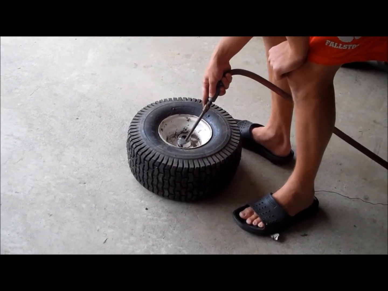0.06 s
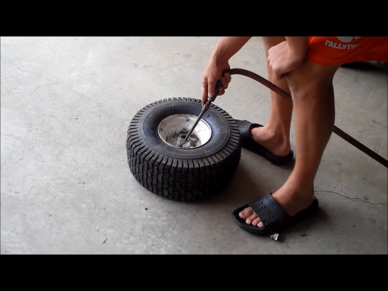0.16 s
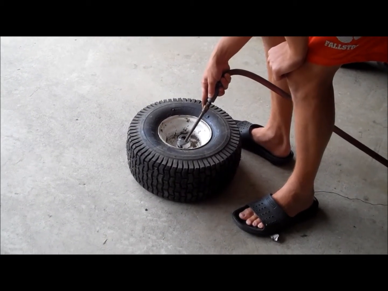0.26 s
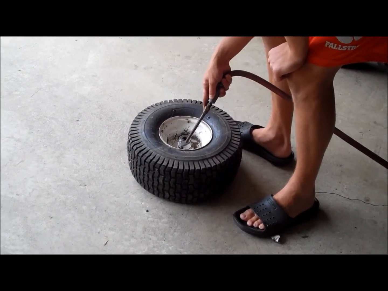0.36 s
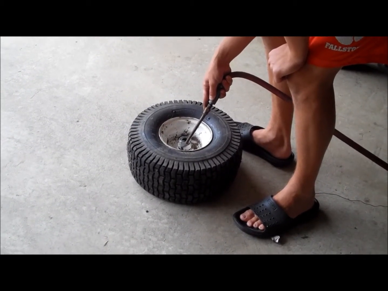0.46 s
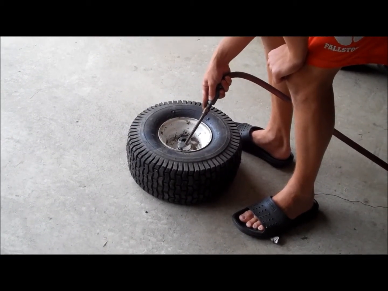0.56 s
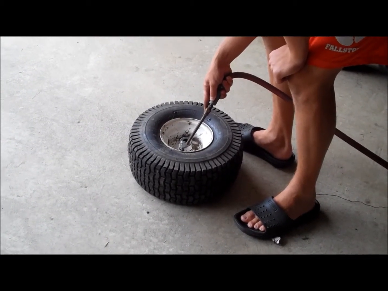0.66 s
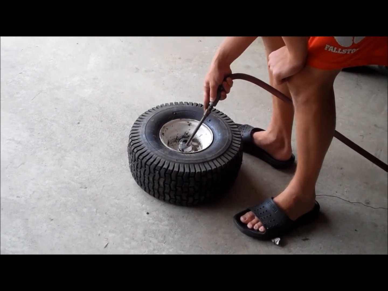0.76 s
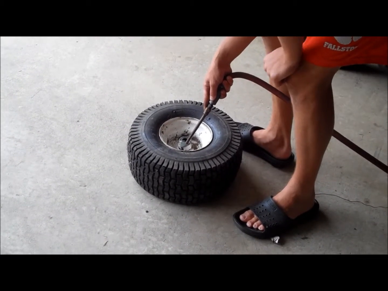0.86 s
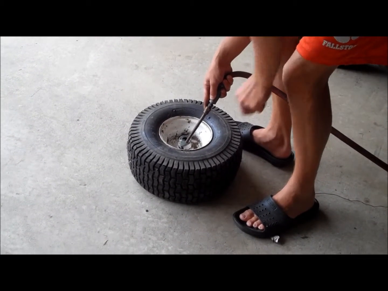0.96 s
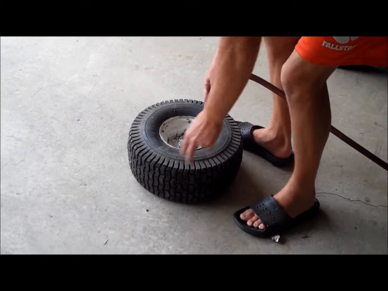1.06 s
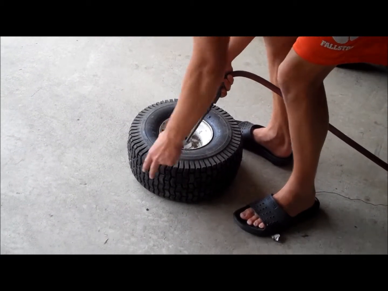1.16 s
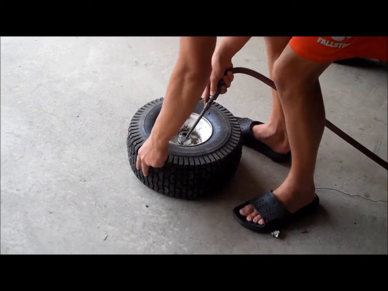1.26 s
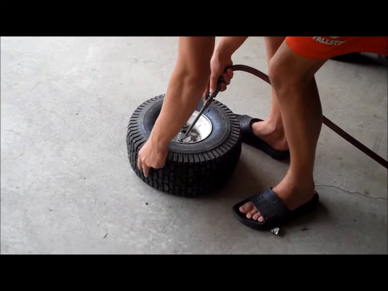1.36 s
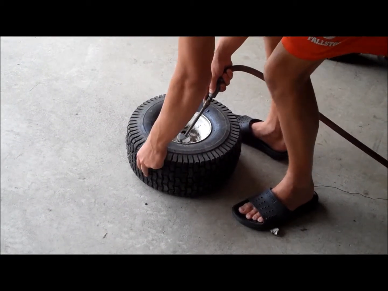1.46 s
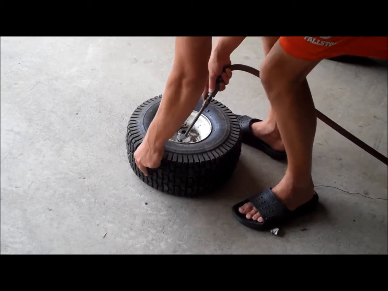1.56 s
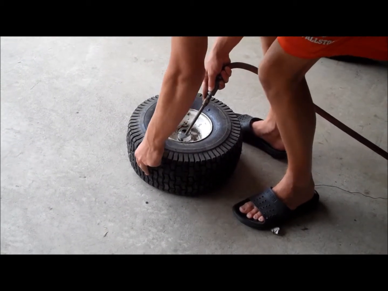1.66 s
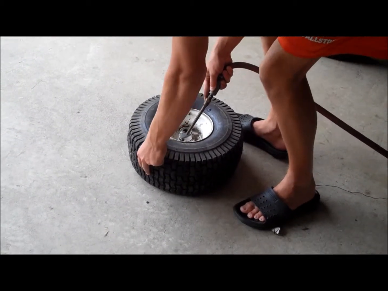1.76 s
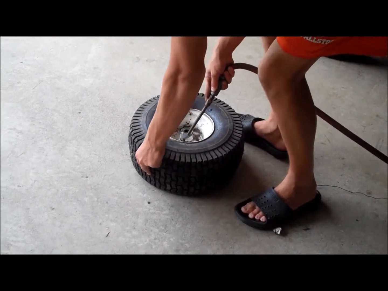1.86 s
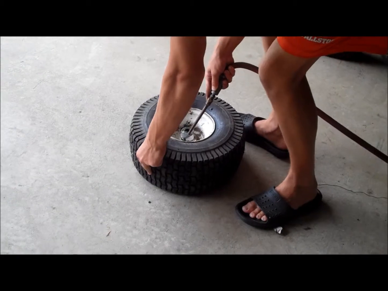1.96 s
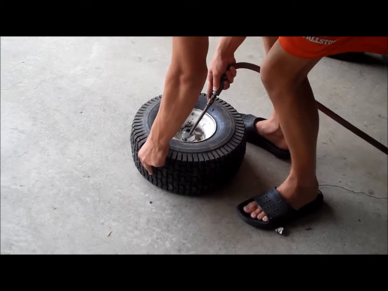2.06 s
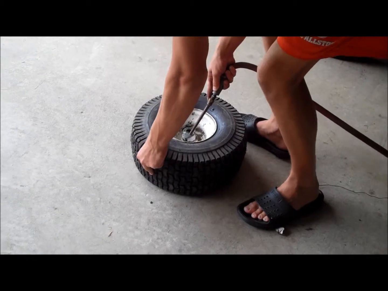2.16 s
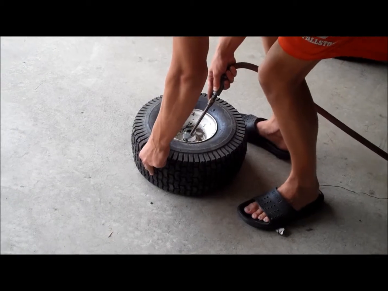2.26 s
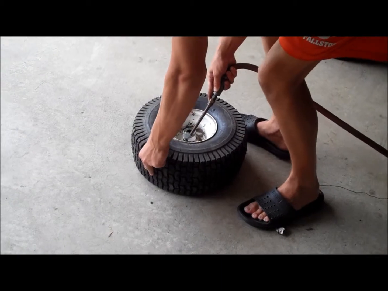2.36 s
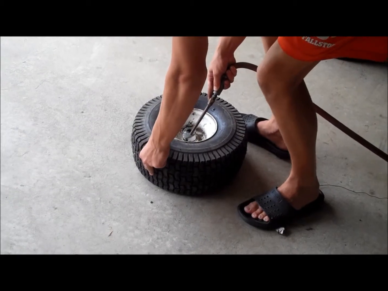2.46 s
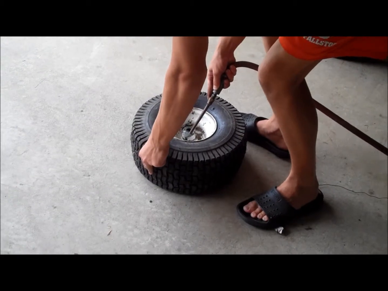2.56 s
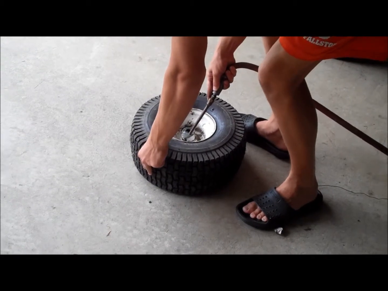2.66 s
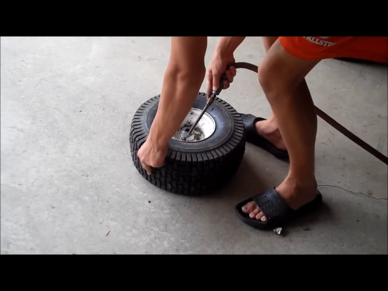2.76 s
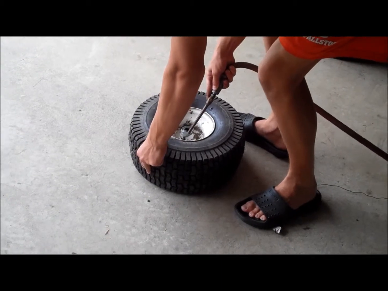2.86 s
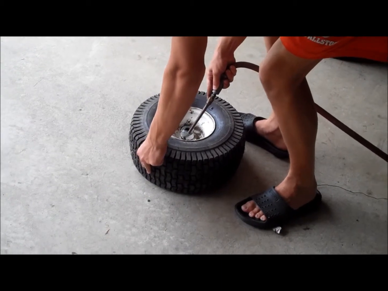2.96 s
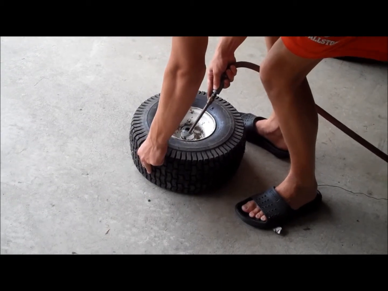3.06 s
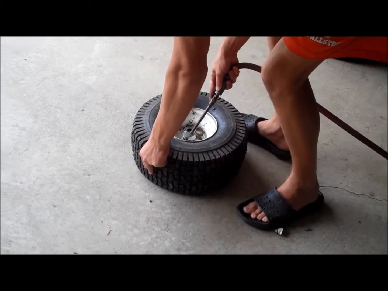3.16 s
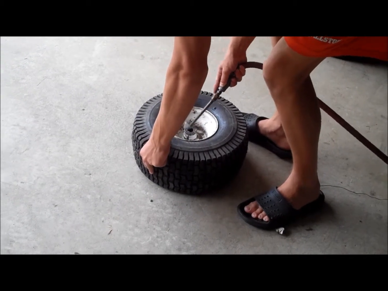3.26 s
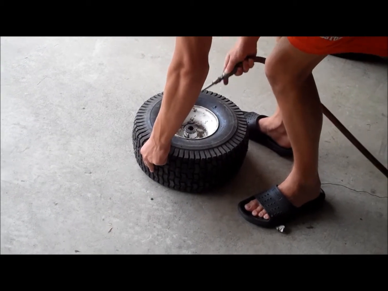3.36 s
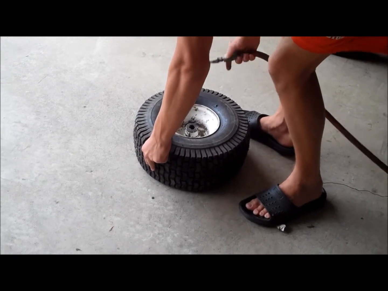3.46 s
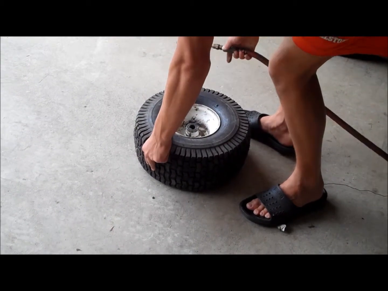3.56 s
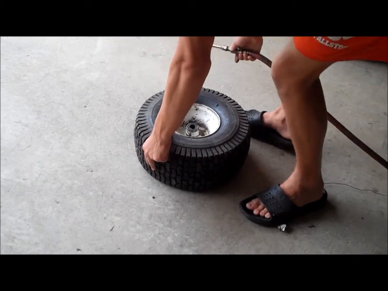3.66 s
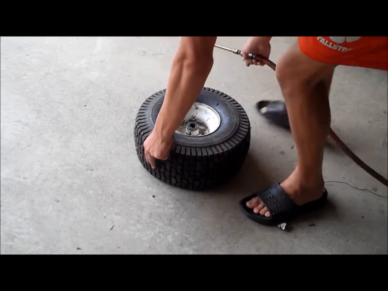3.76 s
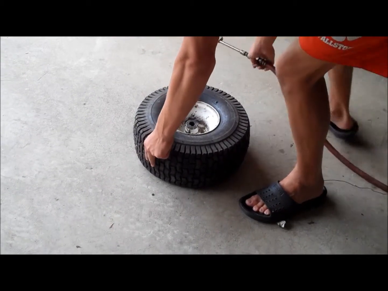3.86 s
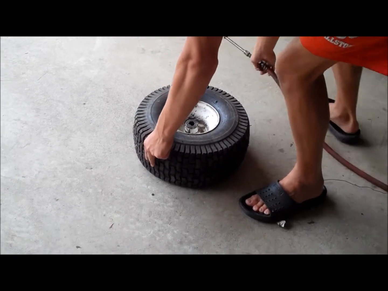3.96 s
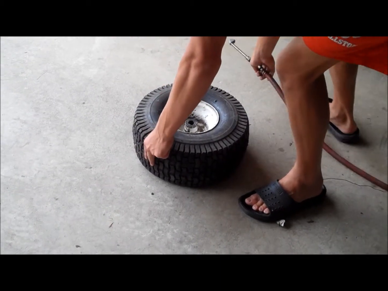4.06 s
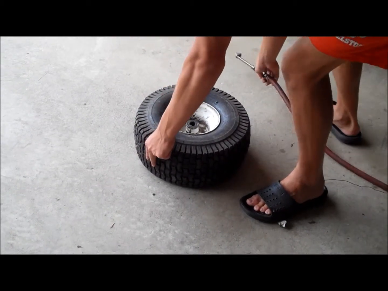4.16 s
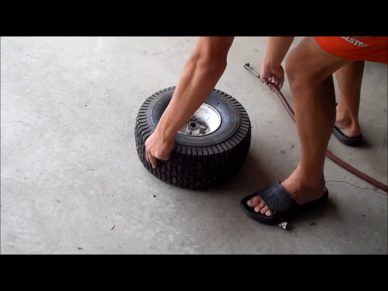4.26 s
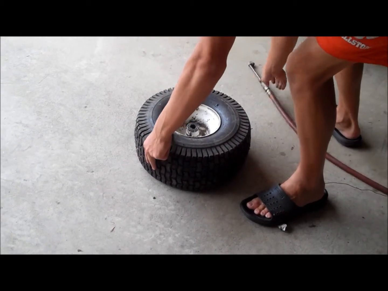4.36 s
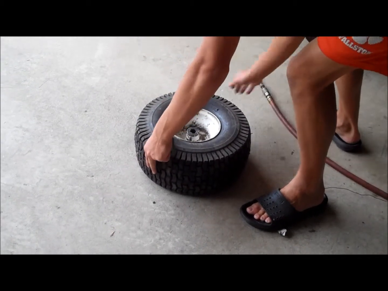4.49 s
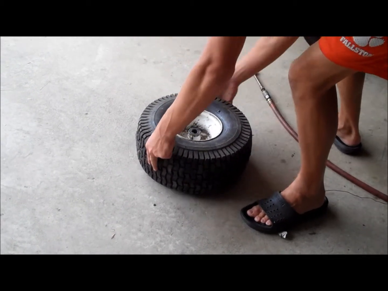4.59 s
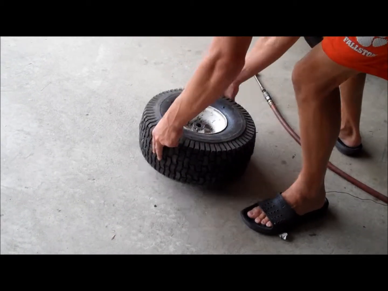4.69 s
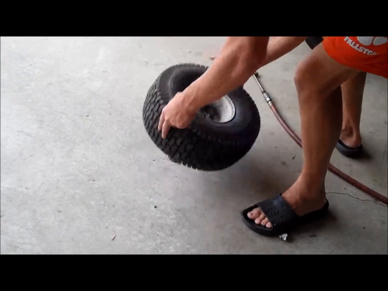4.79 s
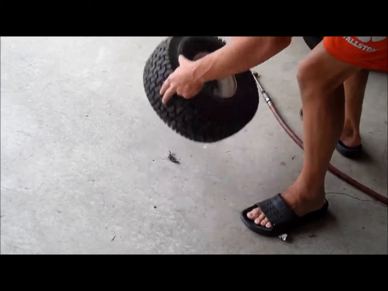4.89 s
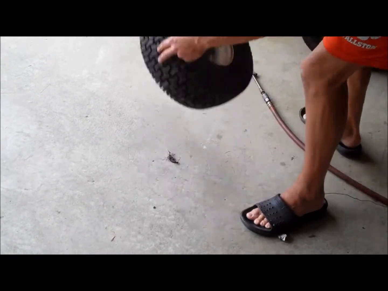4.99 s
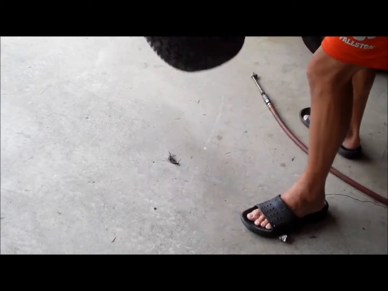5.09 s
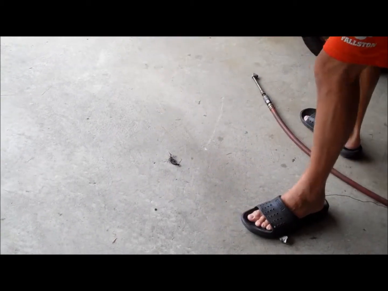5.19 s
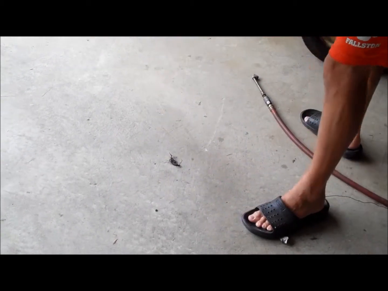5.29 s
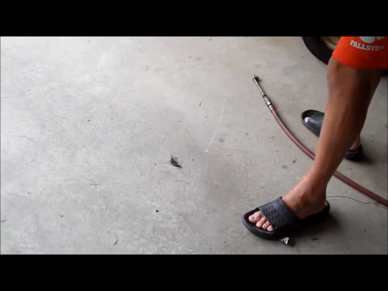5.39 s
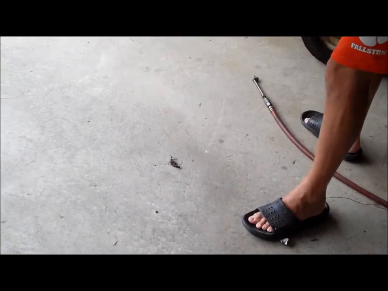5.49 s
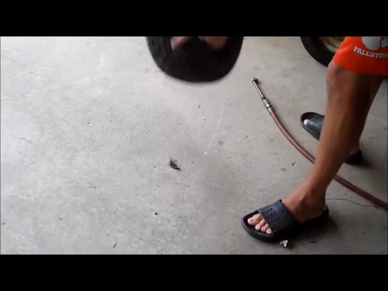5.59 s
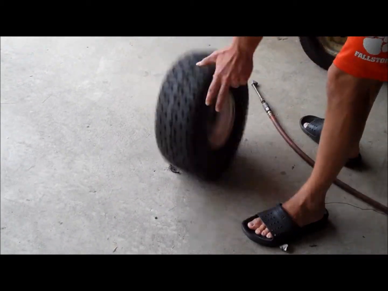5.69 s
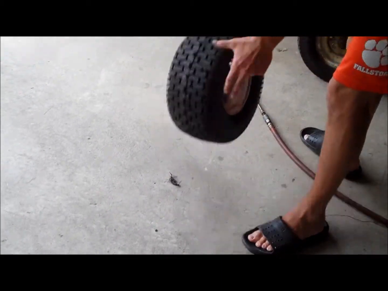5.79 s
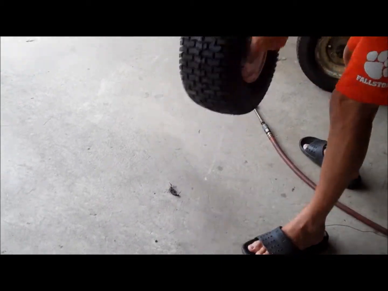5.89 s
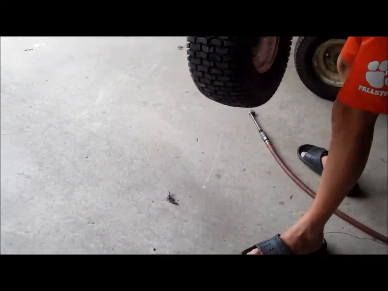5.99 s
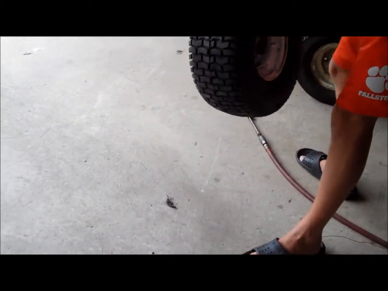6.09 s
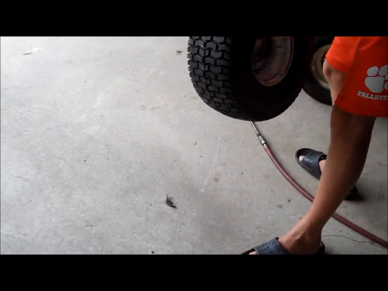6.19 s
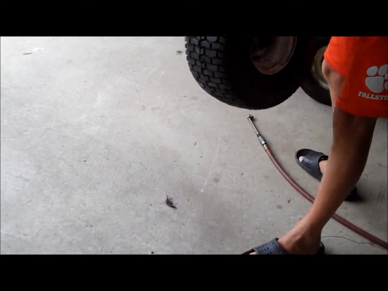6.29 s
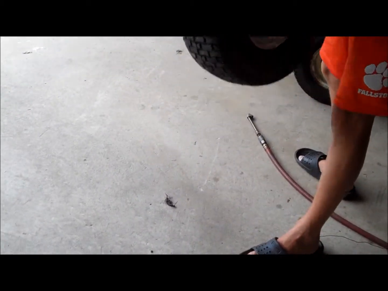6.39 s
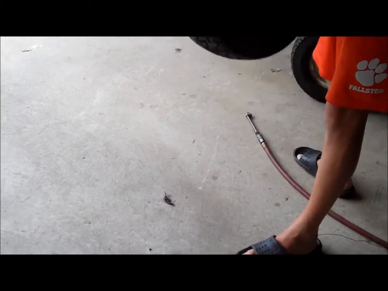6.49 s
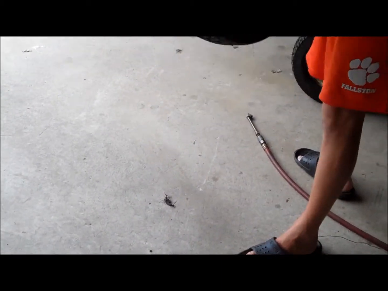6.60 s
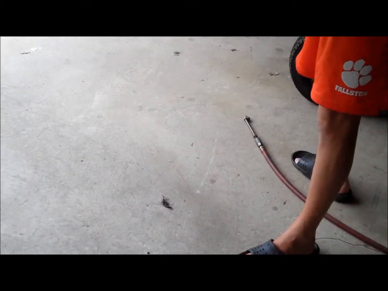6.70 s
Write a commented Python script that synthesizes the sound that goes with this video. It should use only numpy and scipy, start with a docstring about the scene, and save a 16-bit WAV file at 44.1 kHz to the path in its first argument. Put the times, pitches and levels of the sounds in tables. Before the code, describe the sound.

Compressed air hisses steadily from a leaky chuck on a small tire, close to the microphone in a garage. About halfway through, the chuck comes off the valve with a spit and a sharp pop but keeps hissing. A sandal scuffs, the chuck clinks onto concrete and a hand softly slaps the tire. Near the end the tire bounces once with a loud smack. A machine hums faintly behind.

```python
"""Leaky air chuck in a garage

Close to a stereo microphone, compressed air hisses from a leaky chuck on a small tire. The chuck pops
off the valve, keeps leaking and is laid on the concrete; the tire is slapped, then bounced once.
Behind it a machine hums and a far engine slows. The bounce clips the preamp and the gain ducks."""
import sys
import numpy as np
from scipy import signal
from scipy.fft import rfft, irfft, next_fast_len
from scipy.io import wavfile
from scipy.ndimage import uniform_filter1d, map_coordinates

SR = 44100
rng = np.random.default_rng(int(sys.argv[2]) if len(sys.argv) > 2 else 0)


def transcribe(u):
    """Save the signal u as a 16-bit wav file named by the first command-line argument.

    u: samples, shape (n,) or (channels, n), limited to [-1, 1]; the rate is SR.
    q: integer samples, one column per channel.
    """
    v = np.clip(np.atleast_2d(u).T, -1, 1)
    q = np.round(v * 32767).astype(np.int16)
    wavfile.write(sys.argv[1], SR, q)


N = 297234


def amp(db):
    """Gain of a level in dB."""
    return 10 ** (np.asarray(db) / 20)


def unit(x):
    """Scaled to rms 1."""
    return x / np.sqrt(np.mean(x ** 2) + 1e-20)


def along(points, hz):
    """(Hz, value) points read at hz on a log axis."""
    f, v = np.transpose(points)
    return np.interp(np.log(hz + 1), np.log(f + 1), v)


def curves(rows, t=None):
    """The columns after the time, read at times t (every sample if not given)."""
    times, *columns = np.transpose(rows)
    return [np.interp(np.arange(N) / SR if t is None else t, times, c) for c in columns]


def wobble(rate):
    """A smooth random curve, rate knots a second."""
    return map_coordinates(rng.standard_normal(int(N * rate / SR) + 4), [np.arange(N) * rate / SR])


def filtered(x, response):
    """x through a complex frequency response."""
    size = next_fast_len(N + SR // 2)
    return irfft(rfft(x, size) * response(np.fft.rfftfreq(size, 1 / SR)), size)[..., :N]


def resonant(x, peaks):
    """x through causal (Hz, width, dB) resonances of alternating sign."""
    def response(f):
        return sum((-1) ** k * amp(db) * 1j * f * width / (hz * hz - f * f + 1j * f * width)
                   for k, (hz, width, db) in enumerate(peaks))
    return filtered(x, response)


def ring(modes, scatter_db, attack_s):
    """One blow on (Hz, dB, t60) modes, each at a new strength."""
    t = np.arange(SR // 2) / SR
    tones = sum(amp(db + rng.normal(0, scatter_db) - 60 * t / t60) * np.sin(2 * np.pi * hz * t)
                for hz, db, t60 in modes)
    return tones * (1 - np.exp(-t / attack_s))


def scrape(events, peaks, blow=0, grit=1):
    """Short runs of rough contact, each led by an optional sharp blow, excite resonances."""
    force = np.zeros(N)
    t = np.arange(SR // 10) / SR
    for start, db, length in events:
        contact = grit * np.exp(-(t / length) ** 4) * rng.standard_normal(len(t))
        contact[0] += blow
        force[round(start * SR):][:len(t)] += amp(db) * contact
    return resonant(force, peaks)


# likeness of the microphone's two channels: (frequency [Hz], correlation [0-1])
MIC_LIKENESS = [(60, 0.77), (150, 0.97), (380, 0.91), (950, 0.87), (2370, 0.81), (5950, 0.48),
                (14900, 0.49)]
# their balance: (frequency [Hz], left minus right [dB])
MIC_BALANCE = [(60, 0), (240, 1), (950, 0.5), (3760, 1.5), (14900, -1.5)]

def stereo_noise(shape, size=1024, likeness=MIC_LIKENESS):
    """Noise at two closely spaced capsules, its short-time spectrum scaled by shape(Hz, s)."""
    hz, t, noise = signal.stft(rng.standard_normal((2, N + SR)), SR, nperseg=size)
    spread = np.arccos(np.clip(along(likeness, hz), -1, 1))[:, None] / 2
    mid, side = noise[0] * np.cos(spread), noise[1] * np.sin(spread)
    lean = amp(along(MIC_BALANCE, hz) / 2)[:, None]
    pair = np.array([(mid + side) * lean, (mid - side) / lean])
    return signal.istft(pair * shape(hz[:, None], t), SR, nperseg=size)[1][:, :N]


# low rumble all around the microphone: (frequency [Hz], relative level [dB])
RUMBLE_SPECTRUM = [(11, -32), (18, -0.5), (124, -4.5), (146, -6), (337, -8), (404, -7), (438, -11),
                   (460, -6.5), (618, -13), (900, -8.5), (1170, -10), (1980, -120)]

def rumble():
    """The garage's rumble thins as the engine leaves."""
    start_db, fade_db_per_s = -52.5, 0.29
    noise = filtered(stereo_noise(lambda hz, t: 1), lambda hz: amp(along(RUMBLE_SPECTRUM, hz)))
    return amp(start_db - fade_db_per_s * np.arange(N) / SR + 1.2 * wobble(2.56)) * unit(noise)


# the far engine's upper tone: (time [s], frequency [Hz])
ENGINE_PITCH = [(0, 102.8), (1.1, 98.7), (2.8, 96.3), (3.1, 92), (5.2, 84)]
# its two tones at the microphone: (time [s], upper level [dB], lower level [dB])
ENGINE_LEVELS = [(0, -48, -56), (0.15, -42, -55), (0.4, -45, -63), (0.75, -49, -57), (1.15, -57, -47.5),
                 (1.68, -46.5, -48.5), (2, -51, -51), (2.5, -60, -62), (2.8, -53, -58), (2.95, -65, -60),
                 (3.12, -52, -64), (3.3, -62, -56.5), (3.75, -62, -59), (3.9, -62, -76), (4.8, -67, -71),
                 (5.15, -68, -60), (5.5, -72, -66)]

def far_engine():
    """Two unsteady tones swell and fade in turn, sinking as the engine slows."""
    lower_ratio = .625
    cycles = np.cumsum(curves(ENGINE_PITCH)[0]) / SR
    return sum(amp(db + 0.75 * wobble(6.8)) * np.sin(2 * np.pi * ratio * cycles)
               for ratio, db in zip((1, lower_ratio), curves(ENGINE_LEVELS)))


# a machine in the background, centre: (frequency [Hz], level [dB])
HUM_TONES = [(119.5, -61.5), (409.1, -55), (441.4, -68), (468.3, -63.5)]

def machine_hum():
    """Tones of steady pitch, each wavering slightly in level."""
    t = np.arange(N) / SR
    return sum(amp(db + 0.59 * wobble(4.2)) * np.sin(2 * np.pi * (hz * t + rng.random()))
               for hz, db in HUM_TONES)


# the garage's reverberation: (frequency [Hz], t60 [s])
GARAGE_DECAY = [(60, 0.34), (500, 0.3), (2800, 0.34), (5000, 0.11), (12000, 0.14)]
# its likeness at the two capsules: (frequency [Hz], correlation [0-1])
GARAGE_LIKENESS = [(150, .98), (800, .96), (1200, .85), (1700, .3), (6000, 0.1)]

def garage(x):
    """The walls answer about 2 ms late, each frequency dying at its own speed."""
    def decay(hz, t):
        return (hz > 100) * amp(-60 * t / along(GARAGE_DECAY, hz))
    tail = stereo_noise(decay, size=256, likeness=GARAGE_LIKENESS)[:, :SR // 2]
    delayed = np.pad(x, (100, 0))[None]
    return signal.fftconvolve(delayed, tail / np.linalg.norm(tail[0]), axes=1)[:, :N]


# scuffs on the floor nearby: (time [s], level [dB], length [s])
SCUFFS = [(3.764, -28, 0.004), (3.826, -17, 0.005), (3.8525, -18.5, 0.004)]
# the sole's resonances: (frequency [Hz], width [Hz], gain [dB])
SOLE_PEAKS = [(1820, 440, -1.5), (2970, 340, 3)]

def sandal_scuffs():
    """A sandal's sole rubs briefly over the floor."""
    return scrape(SCUFFS, SOLE_PEAKS)


# the chuck set down near the microphone: (time [s], level [dB], rattle length [s])
CHUCK_HITS = [(4.3553, -7, .0003), (4.3566, -14, .0005), (4.4763, -7, .0013), (4.4782, -9, .0036),
              (4.5417, -19, .0015), (5.444, -22, .002)]
# its resonances: (frequency [Hz], width [Hz], gain [dB])
STEEL_PEAKS = [(1000, 2000, -14), (3300, 1000, -6), (4950, 1300, 0), (6900, 1800, -1), (9800, 2400, -8)]

def chuck_clinks():
    """Steel strikes concrete and rattles for an instant."""
    return scrape(CHUCK_HITS, STEEL_PEAKS, blow=2.6, grit=0.89)


# the close bounce, then its echo off the near wall:
# (time [s], carcass level [dB], crack level [dB], boom level [dB], lugs that land [count])
BOUNCE = [(5.8018, -16, 10, -14.5, 5), (5.8074, -23, -2, -34.5, 3)]
# a hand on the sidewall: (time [s], level [dB])
HAND_SLAPS = [(4.691, -29), (4.696, -25.5), (4.738, -47)]
# modes of the rubber carcass, the air inside and the sidewall: (frequency [Hz], level [dB], t60 [s])
CARCASS_MODES = [(100, -9, .1), (165, -12, .08), (236, -6, .12), (400, -14, .04), (481, 0, .08),
                 (522, -5, .07), (612, -2.5, .07), (710, -2, .05), (800, 1, .04), (1061, -6.5, .04),
                 (1251, -4, .03), (1424, -6, .03), (1620, -2, .03), (1899, -3.5, .03)]
CAVITY_MODES = [(52, 2, 0.17), (34, -25, 0.086)]
SIDEWALL_MODES = [(168.6, -19, 0.17), (346, 4.5, 0.032), (480, -6.5, 0.09)]
# the tread's resonances: (frequency [Hz], width [Hz], gain [dB])
TREAD_PEAKS = [(1360, 620, 0), (2935, 2500, 1.5), (5230, 5300, -3.5)]

def tire():
    """The bounce rings the carcass, pumps the air inside and rattles the lugs; a slap adds its boom."""
    lugs_per_s = 2750
    body, boom, lugs = np.zeros((3, N + SR))
    for start, body_db, crack_db, boom_db, count in BOUNCE:
        k = round(start * SR)
        body[k:k + SR // 2] += amp(body_db) * ring(CARCASS_MODES, scatter_db=1.5, attack_s=.0003)
        boom[k:k + SR // 2] -= amp(boom_db) * ring(CAVITY_MODES, scatter_db=1, attack_s=.003)
        t = np.arange(round(count * SR / lugs_per_s)) / SR
        lugs[k:k + len(t)] = amp(crack_db) * np.sin(np.pi * lugs_per_s * t) ** 4  # soft rubber contacts
    for start, db in HAND_SLAPS:
        k = round(start * SR)
        boom[k:k + SR // 2] += amp(db) * ring(SIDEWALL_MODES, scatter_db=1, attack_s=.0012)
    return body[:N], boom[:N], resonant(lugs[:N], TREAD_PEAKS)


# the tread meets the concrete, close by: (time [s], level [dB], length [s])
TREAD_LANDING = [(5.802, -.6, .009)]
# the contact patch's resonances: (frequency [Hz], width [Hz], gain [dB])
PATCH_PEAKS = [(776, 280, 2), (1410, 710, -0.5), (2120, 750, -2.5), (3320, 880, -2.5)]

def tread_smack():
    """The flattening tread squeezes out air and grit."""
    return scrape(TREAD_LANDING, PATCH_PEAKS)


# knocks on the wheel rim, close by: (time [s], level [dB], length [s])
RIM_KNOCKS = [(3.3203, -1, .001), (3.332, -12, .003), (3.569, -16, .001)]
# the rim's resonances: (frequency [Hz], width [Hz], gain [dB])
RIM_PEAKS = [(160, 140, -6), (480, 280, -3), (750, 250, -1), (1000, 300, -5), (1800, 900, -8),
             (3800, 2200, -9)]

def valve_pop():
    """The valve's snap, its rebound and a touch of the chuck sound through the rim."""
    return scrape(RIM_KNOCKS, RIM_PEAKS, blow=7, grit=.35)


def valve_spit():
    """Air trapped between chuck and valve rushes out; the closing valve cuts it and the rest fades."""
    peak_s, hold_s, hold_db = 3.303, .016, -24.5
    rise_db_per_s, drop_db, fade_db_per_s = 700, 7, 112
    t = np.arange(N) / SR - peak_s
    opening_db = rise_db_per_s * np.minimum(t, 0)
    closing_db = -drop_db - fade_db_per_s * (t - hold_s)
    level_db = hold_db + np.where(t < hold_s, opening_db, closing_db)
    rush = resonant(rng.standard_normal(N), [(4400, 2100, 7), (7400, 3800, -20)])
    return amp(level_db + 0.83 * wobble(150)) * unit(rush)


def mottle(shape, bins, frames):
    """A random frequency-by-time field of rms 1, smoothed over bins and frames."""
    field = uniform_filter1d(rng.standard_normal(shape), size=bins, axis=0)
    return unit(uniform_filter1d(field, size=frames, axis=1))


# the leak, close to the microphone: (time [s], level [dB], treble tilt [dB/octave])
JET_ENVELOPE = [(0, -30.5, 2), (0.9, -29.5, 1), (1.16, -32, 2.5), (2.1, -31.5, 2.5), (3.2, -30.5, 1.5),
                (3.27, -31, 3.5), (3.42, -31.5, 2.5), (3.56, -32, 0), (3.65, -36, -0.5), (3.8, -32, -2.5),
                (4.1, -34, 1), (4.3, -35, 2), (4.44, -38, 0), (4.85, -38, 1), (5.1, -35, -0.5),
                (5.4, -33, -1.5), (5.95, -31.5, -1.5), (6.3, -33.5, -1), (6.5, -32, -1.5),
                (6.74, -33.5, -1)]
# its spectrum on the valve, then free: (frequency [Hz], relative level [dB])
SEATED_SPECTRUM = [(290, -32.5), (500, -21), (772, -20.5), (939, -14.5), (1300, -16), (1670, -9.5),
                   (1970, -8), (2270, -8), (2840, -3), (3550, -2.5), (3750, -3), (4080, -1), (5800, -0.5),
                   (10400, -12.5), (14200, -29)]
FREE_SPECTRUM = [(290, -46), (500, -24), (700, -26), (794, -22.5), (1050, -38), (1140, -20.5),
                 (1840, -15.5), (1940, -14), (4900, -3.5), (5400, -5), (9870, -13), (13100, -22),
                 (14200, -39)]
# faint resonance of the chuck's bore: (frequency [Hz], half-width [Hz], gain [dB])
BORE_PEAK = (4300, 53, 1)
# on the valve, the rim reflects the jet: (detour [m], strength [0-1])
RIM_REFLECTION = (0.363, 0.12)
# once free, the floor does, closer as the hose is lowered: (time [s], detour [m], strength [0-1])
FLOOR_REFLECTION = [(3.6, .26, .05), (3.69, .255, .3), (3.85, .22, .25), (3.94, .26, .3), (4.33, .165, .24),
                    (4.4, .155, .1)]

def air_jet():
    """Turbulent air hisses; its echo off the nearest surface makes a comb that slides with the hose."""
    release_s, tilt_pivot_hz, sound_m_per_s = 3.3, 4450, 343
    bore_hz, bore_width, bore_db = BORE_PEAK

    def shape(hz, t):
        level_db, treble_db = curves(JET_ENVELOPE, t)
        seated = t < release_s
        colour = amp(np.where(seated, along(SEATED_SPECTRUM, hz), along(FREE_SPECTRUM, hz)))
        detour, strength = np.where(seated, np.reshape(RIM_REFLECTION, (2, 1)),
                                    curves(FLOOR_REFLECTION, t))
        # small surfaces miss the bass and rough ones scatter the treble: the comb is deepest near 5 kHz
        mirror = (hz / 5000 * np.exp(1 - hz / 5000)) ** 2
        colour *= np.abs(1 + strength * mirror * np.exp(-2j * np.pi * hz * detour / sound_m_per_s))
        colour *= amp(bore_db / (1 + ((hz - bore_hz) / bore_width) ** 2))
        colour /= np.sqrt(np.mean(colour ** 2, axis=0))
        tilt_db = treble_db * np.clip(np.log2((hz + 1) / tilt_pivot_hz), 0, 2)
        flicker_db = 0.67 * mottle(colour.shape, bins=12, frames=6)
        ripple_db = 1.96 * mottle(colour.shape, bins=2, frames=60)  # from many farther walls
        return colour * amp(level_db + tilt_db + flicker_db + ripple_db)
    return stereo_noise(shape) * amp(0.31 * wobble(9) + 0.19 * wobble(40))


def scene():
    """From the microphone: close sounds a little to the left, their room, the jet and the background."""
    body, boom, crack = tire()
    chuck, sandal = chuck_clinks(), sandal_scuffs()
    spit, smack, pop = valve_spit(), tread_smack(), valve_pop()
    room = garage(amp(0.5) * body + amp(-6.5) * boom + amp(-8.5) * crack + amp(-4.0) * chuck
                  + amp(-6) * sandal + amp(-9.5) * spit + amp(-.6) * pop + amp(-3.4) * smack)
    near = body + boom + crack + smack + chuck + sandal + spit + pop
    return near * amp([[.6], [-.6]]) + room + air_jet() + machine_hum() + far_engine() + rumble()


def record(dry):
    """The microphone's gain ducks after a loud peak and creeps back; the peak saturates the preamp."""
    threshold_db, max_duck_db, release_db_per_s = -6, 4.5, 7
    ceiling, top_hz = .97, 14200
    peak_db = 20 * np.log10(np.abs(dry).max(axis=0) + 1e-9)
    over_db = np.clip(peak_db - threshold_db, 0, 7)
    recovery_db = release_db_per_s * np.arange(N) / SR
    held_db = np.maximum.accumulate(over_db + recovery_db) - recovery_db
    attack = np.ones(SR // 50) / (SR // 50)  # 20 ms
    duck_db = np.convolve(np.minimum(held_db, max_duck_db), attack)[:N]
    ducked = dry * amp(-duck_db)
    clipped = ducked / (1 + np.abs(ducked / ceiling) ** 4) ** (1 / 4)
    return filtered(clipped, lambda hz: hz < top_hz)


dry = scene()
out = record(dry)
transcribe(out)
```